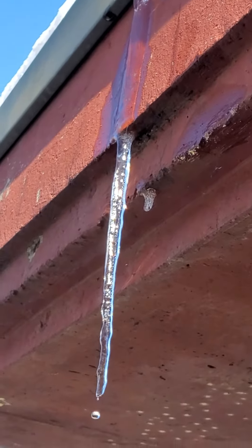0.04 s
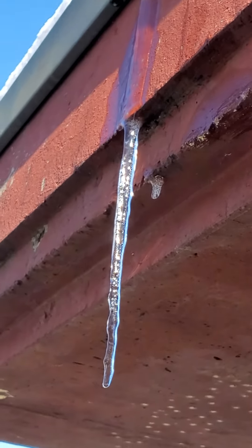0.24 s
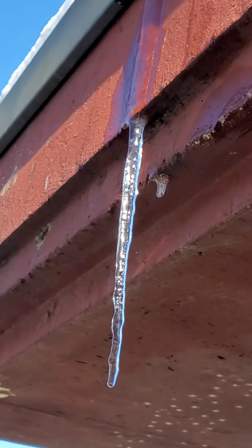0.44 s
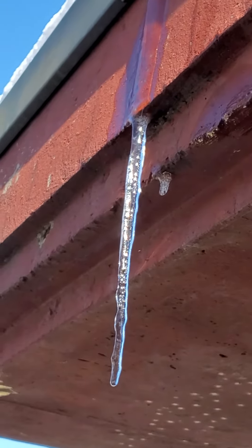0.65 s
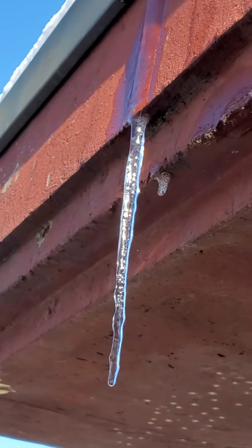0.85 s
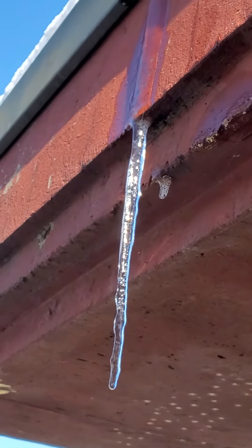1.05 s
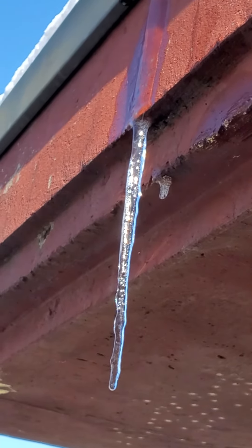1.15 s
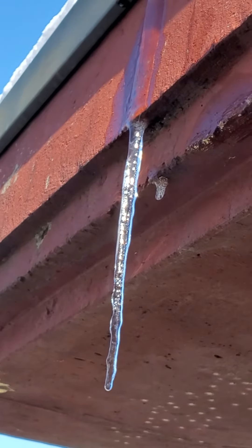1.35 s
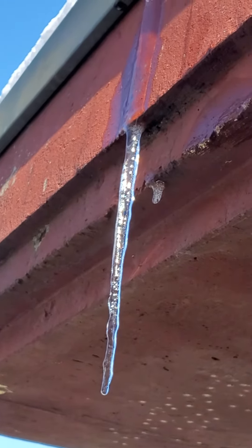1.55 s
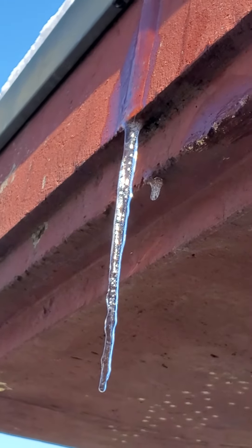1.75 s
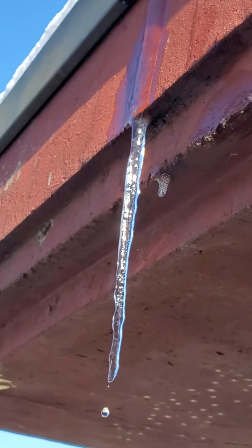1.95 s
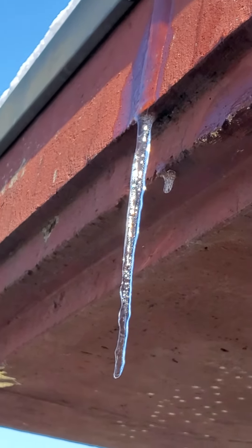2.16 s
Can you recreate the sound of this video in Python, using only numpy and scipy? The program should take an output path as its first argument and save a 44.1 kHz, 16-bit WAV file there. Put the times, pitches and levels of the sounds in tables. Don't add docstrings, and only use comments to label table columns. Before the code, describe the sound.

Meltwater drops tick and splash irregularly from an icicle over far traffic rumble and wind buffets

```python
import sys
import numpy as np
from scipy import signal
from scipy.fft import rfft, irfft
from scipy.io import wavfile

SR = 44100
rng = np.random.default_rng(int(sys.argv[2]) if len(sys.argv) > 2 else 0)


def put_to_file(sound):
    columns = np.atleast_2d(sound).T
    safe = np.clip(columns, -1, 1)
    whole_steps = np.round(safe * 32767)
    wavfile.write(sys.argv[1], SR, whole_steps.astype(np.int16))


def ratio_of_db(decibels):
    return 10 ** (np.asarray(decibels, float) / 20)


N = 97020


def rms_one(x):
    return x / np.sqrt(np.mean(x ** 2) + 1e-20)


def in_time(rows):
    seconds, *columns = np.transpose(rows)
    return np.array([np.interp(np.arange(N) / SR, seconds, column) for column in columns])


def at_hz(points, hz):
    table_hz, value = np.transpose(points)
    return np.interp(np.log(hz), np.log(table_hz), value)


def drift(rate_hz):
    pole = np.exp(-80 * np.pi * rate_hz / SR)
    white = rng.standard_normal(N // 40 + 2002)
    slow = signal.lfilter([1], [1, -2 * pole, pole * pole], white)[2000:]
    return np.interp(np.arange(N) / 40, np.arange(len(slow)), rms_one(slow))


def band(x, low_hz, high_hz, order=2):
    return signal.sosfilt(signal.butter(order, [low_hz, high_hz], "band", fs=SR, output="sos"), x)


def high_pass(x, order, cut_hz):
    return signal.sosfilt(signal.butter(order, cut_hz, "high", fs=SR, output="sos"), x)


def left_right(left_db, right_db):
    return ratio_of_db(np.array([[left_db], [right_db]]))


# frequency in Hz, level in dB per Hz.
RUMBLE = [(25, -15), (48, 1), (90, -2), (122, -8.5), (155, -20), (300, -28.5), (500, -46)]
# frequency in Hz, level in dB per Hz.
ROAR = [(160, -13), (270, -15.5), (420, -17), (540, -22), (950, -19.5), (1300, -27.5), (1900, -37.5),
        (3000, -49)]
# time in seconds, rumble in dB, roar in dB.
SWELL = [(0, -1.5, 0), (.1, 3.5, -1), (.2, 0.5, -1), (.3, 2, 2), (.5, 1, 1), (.6, 1, -1.5), (.8, 0, 2.5),
         (1.0, 2, -1.5), (1.15, 0, 0.5), (1.3, 2.5, 1), (1.42, -2, -0.5), (1.55, -3.5, -1.5), (1.7, -1, -1),
         (1.78, -1.5, 0.5), (1.87, 3, 0.5), (1.95, 2, -1), (2.05, -3, 1.5), (2.2, -0.5, -2)]
# frequency in Hz, correlation 0-1.
LIKENESS = [(60, 0.93), (180, 0.92), (400, 0.84), (650, 0.5), (1100, 0.24), (1650, 0), (4970, 0.0),
            (15000, 0.05)]


def traffic(patchy_db):
    level_db, left_db = -55.5, 1.0
    hz = np.maximum(np.fft.rfftfreq(N, 1 / SR), 1)
    colour = np.hypot(ratio_of_db(at_hz(RUMBLE, hz)), ratio_of_db(at_hz(ROAR, hz)) * (hz > 90))
    colour = colour * (hz > 15) / (1 + (hz / 4000) ** 4)
    mid, side = rfft(rng.standard_normal((2, N))) * colour
    alike = np.clip(at_hz(LIKENESS, hz), -1, 1)
    both = np.sqrt(1 + alike) * mid + np.sqrt(1 - alike) * side * [[1], [-1]]
    rumble_db, roar_db = in_time(SWELL)
    out = 0
    for octave in range(9):
        lowest, highest = -1 if octave > 0 else 0, 1 if octave < 8 else 0
        offset = np.clip(np.log2(hz / 32) - octave, lowest, highest)
        share = np.cos(np.pi / 2 * offset) ** 2
        swell_db = roar_db if octave > 2 else rumble_db
        out = out + irfft(both * share, N) * ratio_of_db(patchy_db * drift(9.5) + swell_db)
    return rms_one(out) * left_right(level_db + left_db, level_db - left_db)


def air():
    white = rng.standard_normal((2, 2, N))
    low = band(white[0], 2500, 11000, order=1) * ratio_of_db(1.2 * drift(9) + 0.9 * drift(30))
    high = band(white[1], 11000, 19000, order=1) * ratio_of_db(0.4 * drift(5))
    return (low + high) * left_right(-83.5, -89)


# frequency in Hz, pitch wander in Hz, wavering in dB, level in dB.
DRONE = [
    (119, 4.5, 3.5, -64),
    (354, 9, 4.5, -79),
]


def drone():
    out = 0
    for hz, wander_hz, waver_db, db in DRONE:
        level = ratio_of_db(db + 3 + waver_db * drift(5))
        out = out + level * np.sin(2 * np.pi * np.cumsum(hz + wander_hz * drift(6)) / SR)
    return out


def burst(rows, spread, rise):
    length = 6000
    out, t = np.zeros((2, N + SR)), np.arange(1, length + 1) / SR
    for start_s, left_db, right_db, fade_s, hz in rows:
        shape = np.exp(-t / fade_s) * (1 - np.exp(-t / (rise * fade_s)))
        white = rng.standard_normal((2, length))
        noise = band(white * shape, hz / spread, min(hz * spread, 0.45 * SR))
        noise = noise * np.sqrt(np.sum(shape ** 2) / np.sum(noise ** 2, axis=1, keepdims=True))
        start = int(start_s * SR)
        out[:, start:start + length] += noise * left_right(left_db, right_db)
    return out[:, :N]


# start in seconds, left in dB, right in dB, fade in seconds, centre in Hz.
SPLASHES = [(.07, -82, -99, .02, 7060), (.167, -89, -93, 0.0049, 4870), (.31, -77.5, -93, 0.012, 5000),
            (.389, -74, -88, 0.025, 6300), (.494, -72, -93, 0.015, 7200), (.494, -78, -75, 0.0078, 12200),
            (.534, -82, -82, 0.033, 9500), (.70, -78, -84, 0.013, 8000), (.803, -77, -86, .025, 6500),
            (.803, -73, -81, 0.019, 2800), (.8715, -66.5, -72, 0.013, 1900),
            (.8715, -78.5, -95, 0.013, 6540), (.832, -79, -90, 0.014, 5500),
            (.974, -73.5, -83, 0.015, 8450), (1.001, -79, -90, .006, 5500), (1.058, -81, -92, 0.011, 8000),
            (1.134, -72.5, -90, 0.008, 7460), (1.34, -78, -81, .025, 1870), (1.42, -79, -92, 0.014, 7200),
            (1.655, -77.5, -78, 0.011, 1880), (1.755, -80, -81, 0.023, 2280),
            (1.77, -84, -92, 0.0097, 6000), (1.96, -84, -96, .03, 13500), (2.035, -73, -85, 0.0063, 9000),
            (2.064, -79, -90, 0.0091, 7000)]


def splashes():
    grain_db, grains_per_s = 2.5, 250
    return burst(SPLASHES, spread=1.58, rise=0.19) * ratio_of_db(grain_db * drift(grains_per_s))


def spray():
    hits_per_s, level_db, left_db = 60, -80, 5.0
    size_db = level_db + 3.0 * np.minimum(rng.exponential(1, (2, N)), 3)
    clicks = ratio_of_db(size_db) * rng.choice([-1, 1], (2, N))
    return clicks * (rng.random((2, N)) < hits_per_s / SR) * left_right(left_db, 0)


# start in seconds, left in dB, right in dB, fade in seconds, centre in Hz.
TICKS = [(.242, -73, -74, .0008, 9000), (.3962, -72, -88, 0.0007, 7500), (.4005, -68, -84, 0.00086, 7000),
         (.409, -76, -88, 0.0009, 7500), (.4932, -59.5, -72, 0.0017, 7700),
         (.4933, -74, -61.5, 0.0016, 11500), (.503, -73, -85, .001, 8000), (.5135, -74, -88, .0008, 6300),
         (.534, -77, -75, .0015, 10500), (.77, -76, -73, 0.00062, 10000), (.8706, -58, -82, 0.0015, 2100),
         (.872, -74.5, -86, 0.0022, 6000), (.916, -75, -69, 0.00087, 10500), (.974, -68, -76, .0015, 10500),
         (.9945, -76, -73, 0.00087, 8500), (1.058, -76, -86, .001, 8000), (1.848, -67, -88, 0.00021, 8200),
         (2.036, -61, -78, 0.00079, 10500), (2.038, -67, -64, 0.00054, 11400)]


def ticks():
    return burst(TICKS, spread=1.37, rise=0.022)


def drops():
    return high_pass(ticks() + splashes() + spray(), order=2, cut_hz=410)


# time in seconds, pitch in Hz, level in dB.
CHIRP = [
    (.108, 4480, -100),
    (.116, 4650, -96),
    (.125, 4820, -90),
    (.136, 5050, -91),
    (.148, 5200, -87),
    (.161, 5280, -92),
    (.166, 5000, -93),
    (.173, 4950, -87.5),
    (.181, 4930, -100),
]


def bird():
    hz, db = in_time(CHIRP)
    level = ratio_of_db(db + 2 * drift(46)) * (db > -99)
    return level * np.sin(2 * np.pi * np.cumsum(hz) / SR) * left_right(0, -20.0)


# time in seconds, left in dB, right in dB.
BREEZE = [(0, -96, -99), (.22, -50.5, -66), (.3, -75, -57), (.45, -59, -49.5), (.6, -55.5, -50),
          (.69, -67, -57.5), (.76, -48, -57), (.85, -47.5, -48), (.97, -67, -47.5), (1.05, -57, -57),
          (1.16, -79, -57), (1.28, -62, -66), (1.36, -75, -76), (2.2, -79, -76)]


def breeze():
    low_hz, mid_hz, high_hz, flutter_db = 40.5, 101.2, 298, -19
    white = rng.standard_normal((2, N + SR))
    lumps = band(white, low_hz, mid_hz)[:, SR:]
    flutter = band(white, mid_hz, high_hz)[:, SR:]
    gust_db = in_time(BREEZE) + 2.9 * np.array([drift(23), drift(22)])
    return (rms_one(lumps) + ratio_of_db(flutter_db) * rms_one(flutter)) * ratio_of_db(gust_db)


# peak time in seconds, port (0 left, 1 right), peak in dB, pitch in Hz, push 1 or pull -1.
PUFFS = [(.268, 1, -36.5, 78.4, -1), (.317, 1, -30, 93, -1), (.342, 1, -28, 58.5, 1),
         (0.402, 1, -36.5, 89, 1), (0.422, 1, -53, 91, 1), (0.493, 1, -37.5, 133, -1),
         (.497, 1, -39.5, 60, 1), (.52, 1, -38.5, 86, -1), (0.57, 1, -34.5, 47, 1),
         (0.644, 1, -39.5, 59.3, 1), (0.741, 0, -35.5, 77.4, 1), (0.8054, 0, -31, 91, -1),
         (.8118, 0, -24.5, 58.5, 1), (0.825, 1, -27.5, 65, -1), (0.976, 1, -35.5, 70.4, -1),
         (1.153, 0, -43.5, 70.5, -1), (1.16, 1, -43.5, 64.4, -1), (1.272, 1, -43, 56.4, -1)]


def puffs():
    rise_cycles, fall_cycles = 0.37, 0.5
    out = np.zeros((2, N))
    for peak_s, side, db, hz, push in PUFFS:
        cycles = (np.arange(N) / SR - peak_s) * hz
        width = np.where(cycles < 0, rise_cycles, fall_cycles)
        swing = np.cos(2 * np.pi * cycles) * np.exp(-0.5 * (cycles / width) ** 2)
        out[int(side)] += np.sign(push) * ratio_of_db(db) * swing
    return out


def plop():
    start_s, level_db, hz, t60_s, rise_s, right_db = 0.8712, -52, 1483, 0.022, 0.00064, 3
    t = np.maximum(np.arange(N) / SR - start_s, 0)
    envelope = ratio_of_db(level_db - 60 * t / t60_s) * (1 - np.exp(-t / rise_s))
    return envelope * np.sin(2 * np.pi * hz * t) * left_right(-right_db, right_db)


def snap():
    start_s, level_db = 1.5153, -36
    click = np.zeros((2, N)) + 1e-18
    click[0, int(start_s * SR)] = -ratio_of_db(level_db)
    return high_pass(click, order=4, cut_hz=5500)


def scene():
    weather = breeze() + puffs()
    return traffic(patchy_db=1.5) + air() + drone() + drops() + bird() + weather + plop() + snap()


def resonate(x, peaks):
    for hz, width_hz, db in peaks:
        gain, k = ratio_of_db(db / 2), np.pi * width_hz / SR
        middle = -2 * np.cos(2 * np.pi * hz / SR)
        x = signal.lfilter([1 + k * gain, middle, 1 - k * gain], [1 + k / gain, middle, 1 - k / gain], x)
    return x


# frequency in Hz, width in Hz, gain in dB.
LEFT_PORT = [(5026, 820, 9), (7850, 2270, 14), (9940, 2100, -3), (13500, 2500, 8), (15170, 1700, 7.5)]
RIGHT_PORT = [(10870, 3400, 10), (8600, 490, 3.5), (6000, 3300, -3), (15300, 5200, 2)]


def ports(dry):
    return np.array([resonate(dry[0], LEFT_PORT), resonate(dry[1], RIGHT_PORT)])


WHINE_HZ = [
    [8000],
    [12000],
]


def circuit():
    hiss_db, whine_db = -87, np.array([[-100], [-107]])
    hiss = ratio_of_db(hiss_db) * rng.standard_normal((2, N))
    tones = np.sin(2 * np.pi * np.array(WHINE_HZ) * np.arange(N) / SR)
    whine = np.sum(ratio_of_db(whine_db) * tones, axis=0)
    return hiss + whine * left_right(3.0, -6.0)


def band_limit(x):
    return signal.sosfilt(signal.butter(12, 16360, fs=SR, output="sos"), x)


def record(dry):
    x = ports(dry) + circuit()
    top_cut = signal.firwin(301, 15740, fs=SR)
    x = signal.fftconvolve(x, top_cut[None], "same")
    return band_limit(x)


dry = scene()
out = record(dry)
put_to_file(out)
```